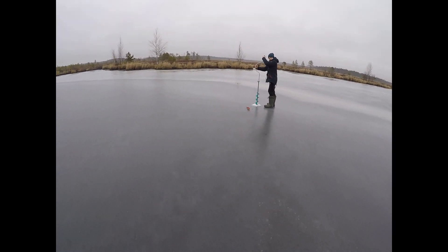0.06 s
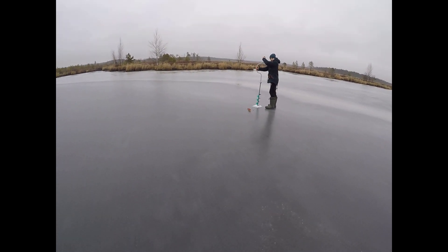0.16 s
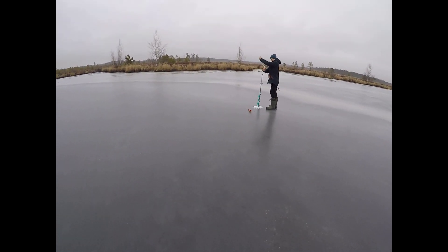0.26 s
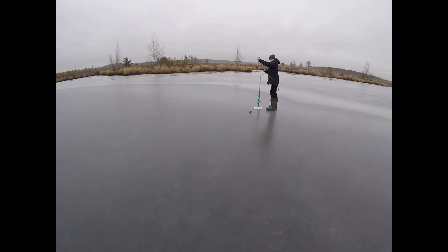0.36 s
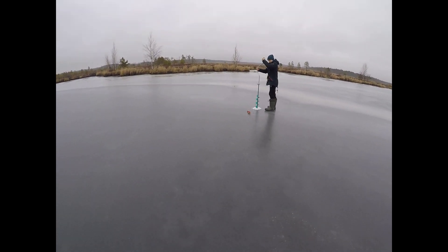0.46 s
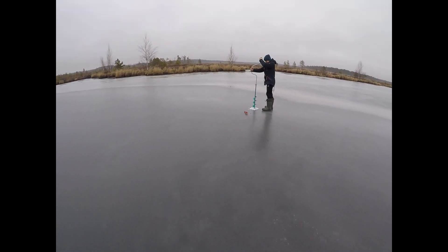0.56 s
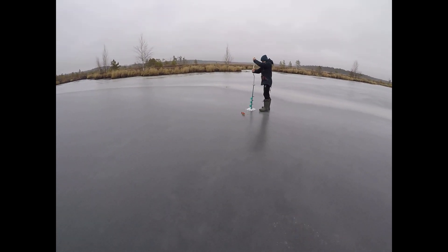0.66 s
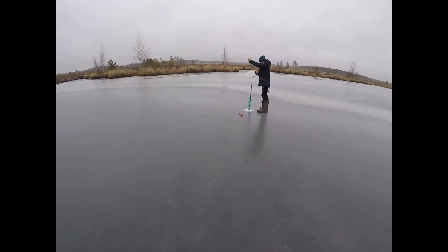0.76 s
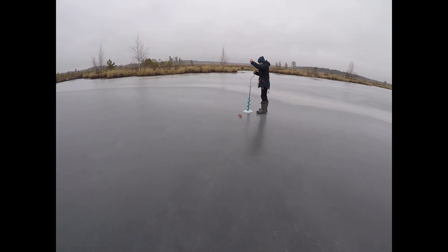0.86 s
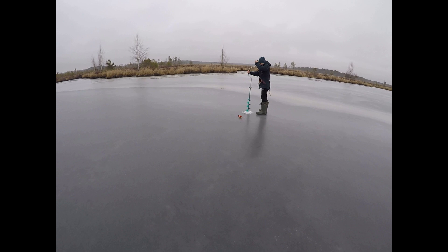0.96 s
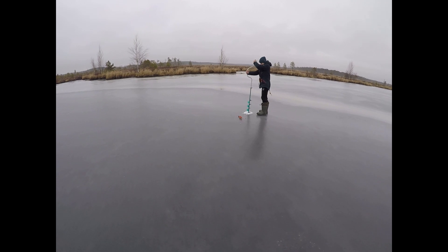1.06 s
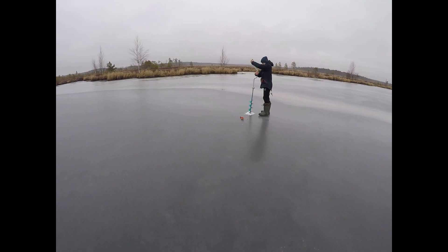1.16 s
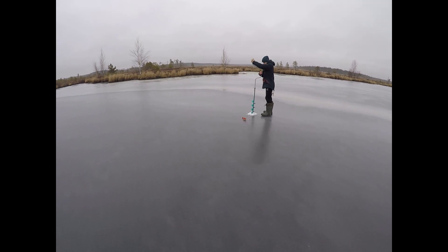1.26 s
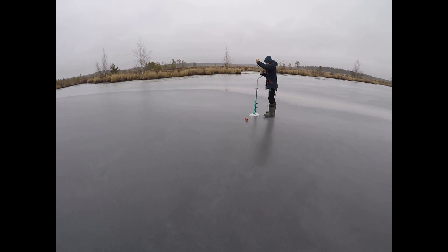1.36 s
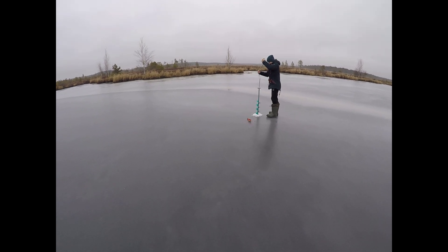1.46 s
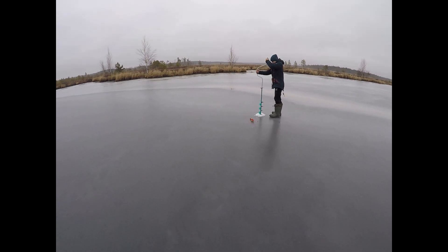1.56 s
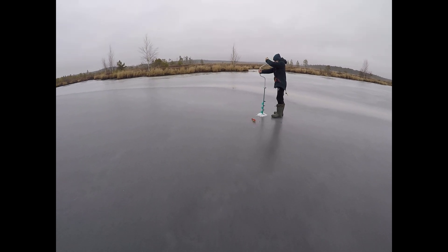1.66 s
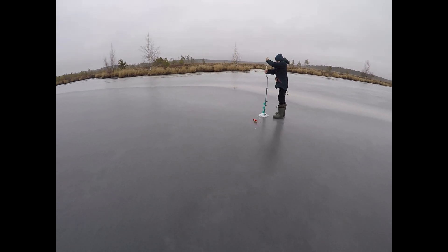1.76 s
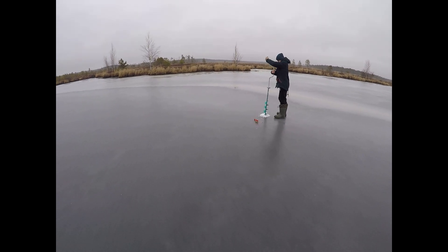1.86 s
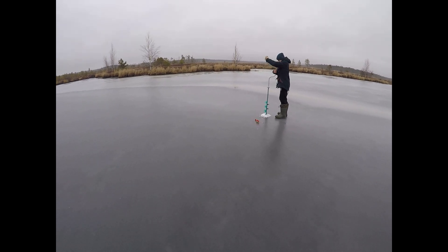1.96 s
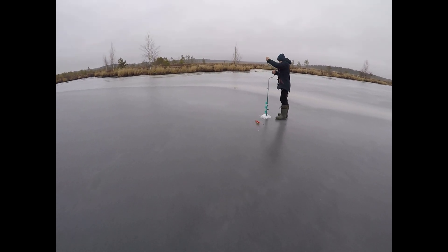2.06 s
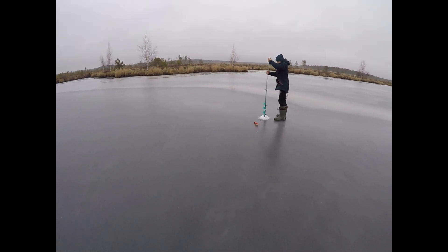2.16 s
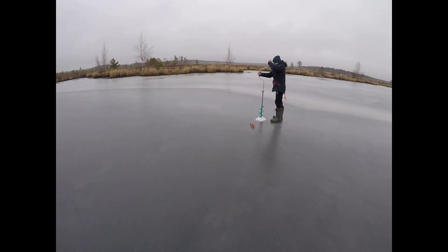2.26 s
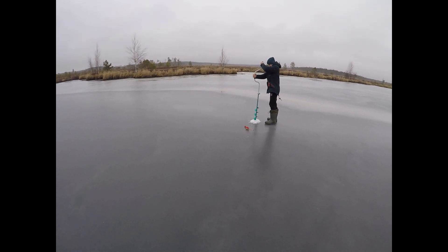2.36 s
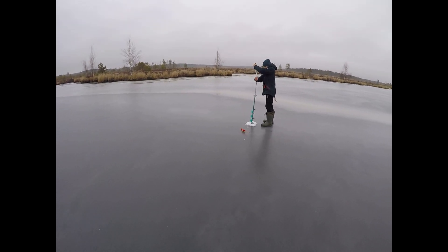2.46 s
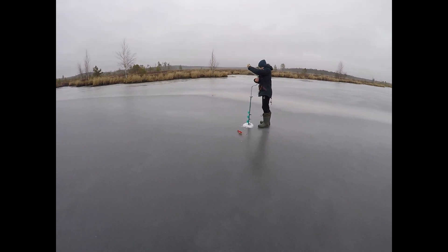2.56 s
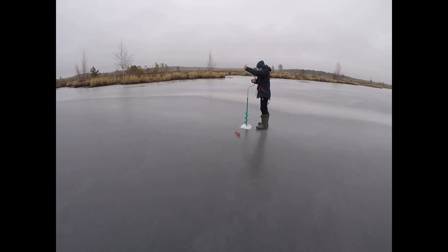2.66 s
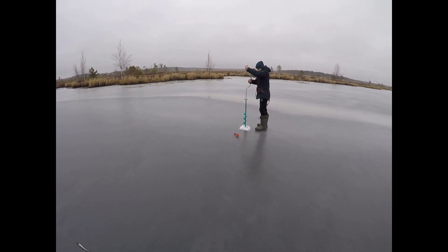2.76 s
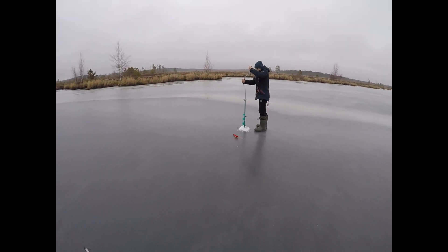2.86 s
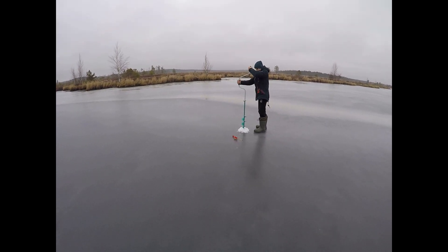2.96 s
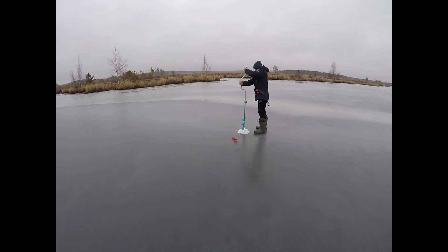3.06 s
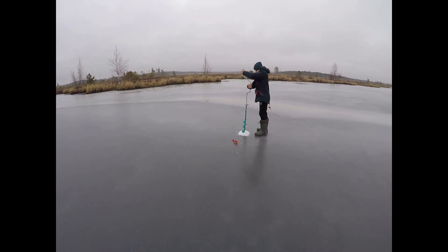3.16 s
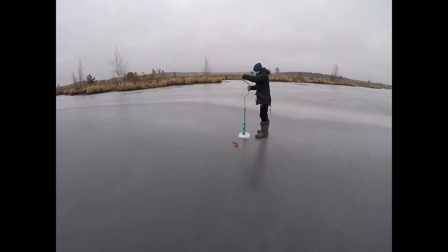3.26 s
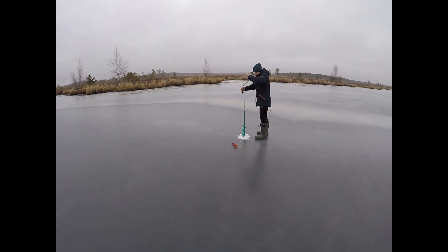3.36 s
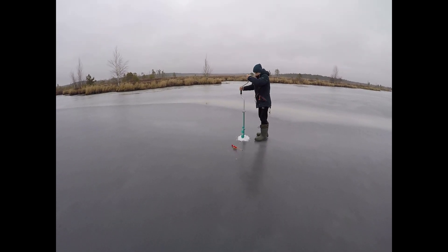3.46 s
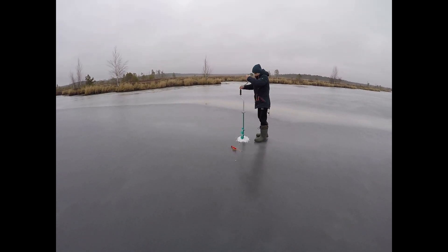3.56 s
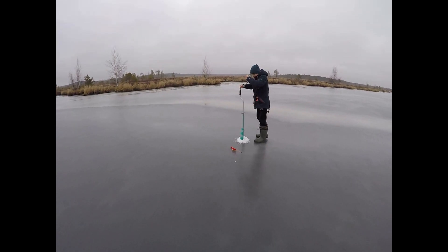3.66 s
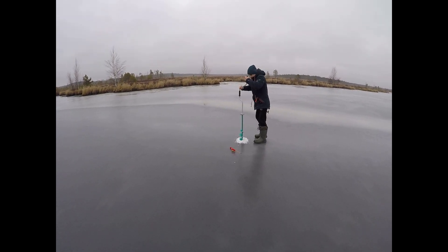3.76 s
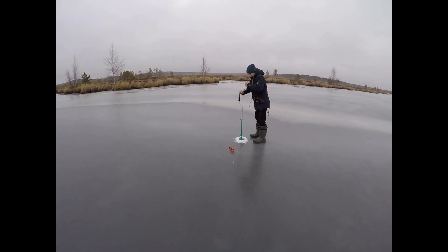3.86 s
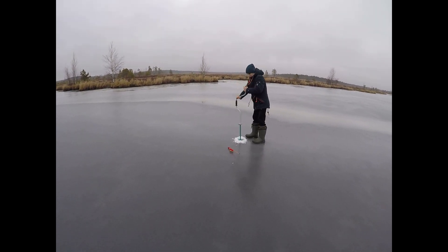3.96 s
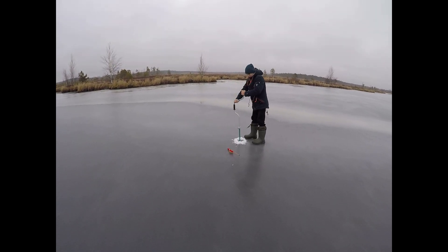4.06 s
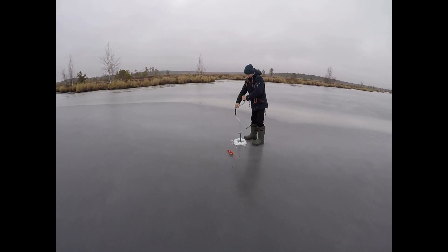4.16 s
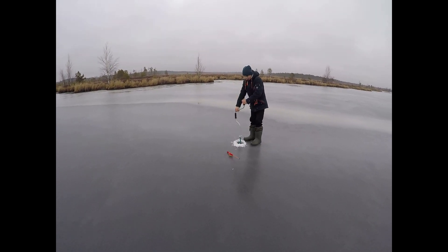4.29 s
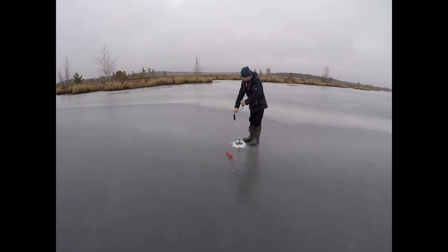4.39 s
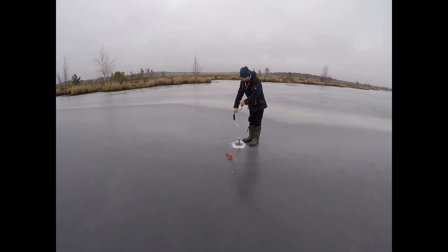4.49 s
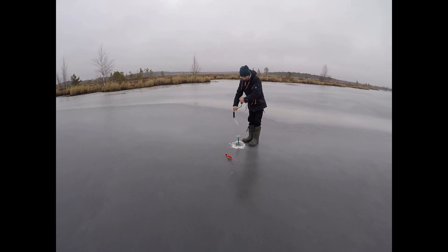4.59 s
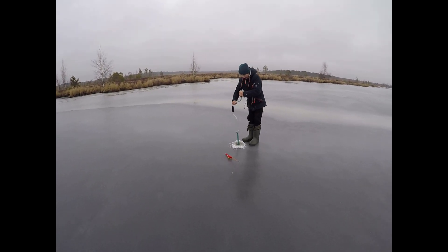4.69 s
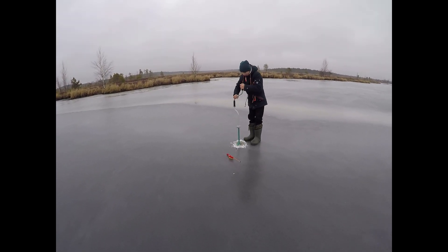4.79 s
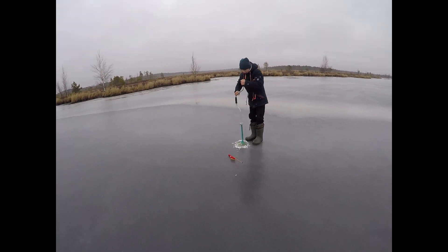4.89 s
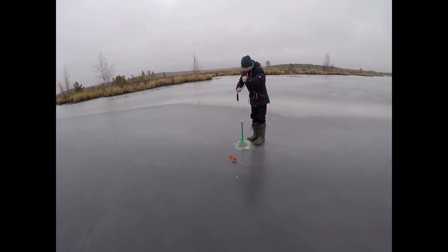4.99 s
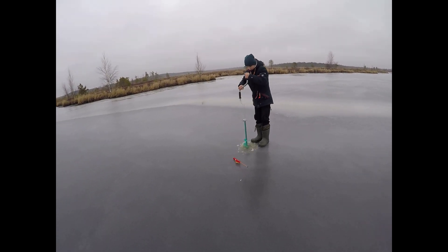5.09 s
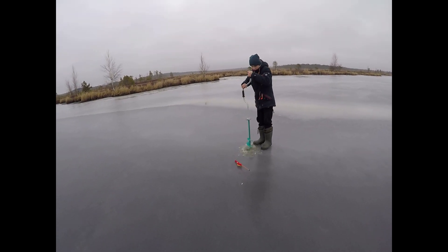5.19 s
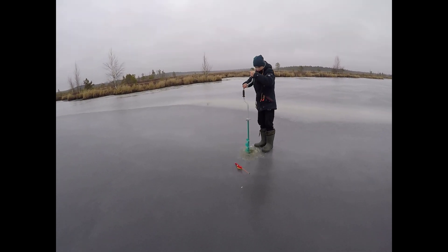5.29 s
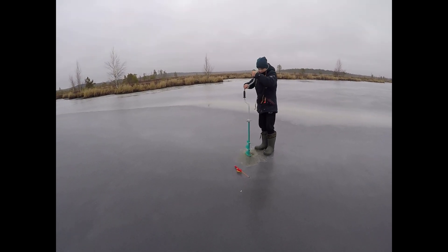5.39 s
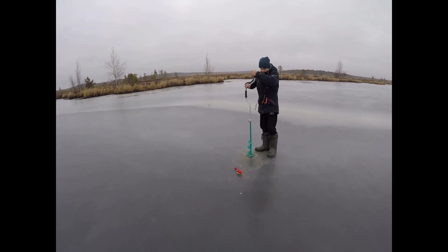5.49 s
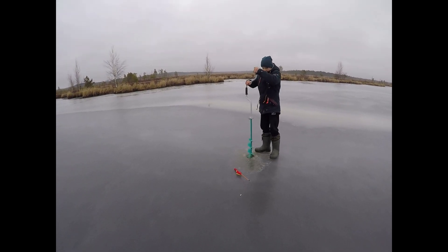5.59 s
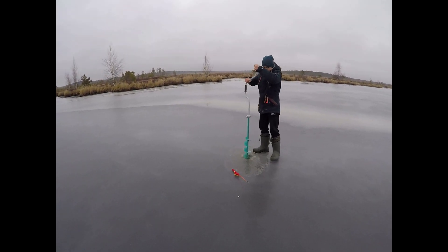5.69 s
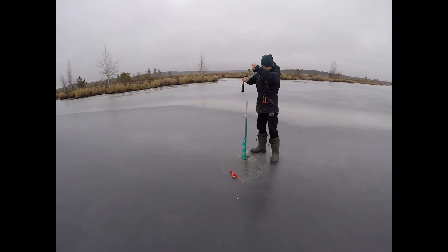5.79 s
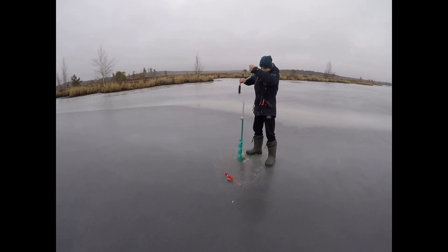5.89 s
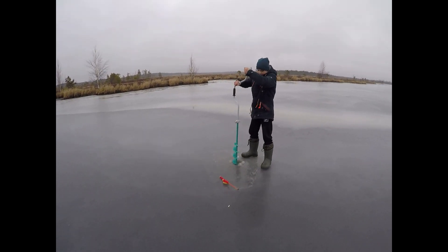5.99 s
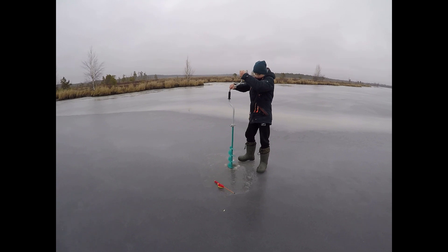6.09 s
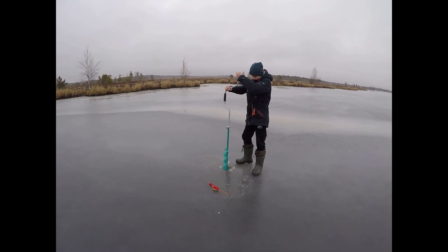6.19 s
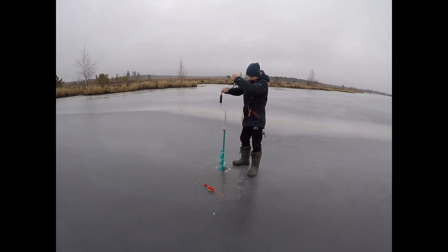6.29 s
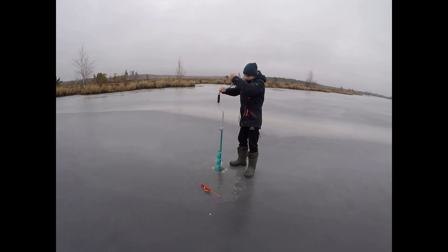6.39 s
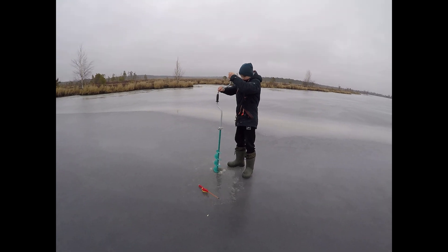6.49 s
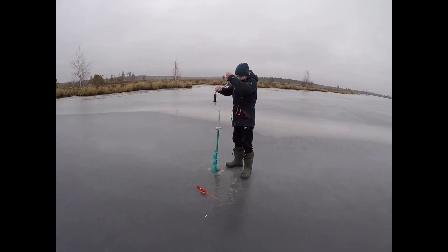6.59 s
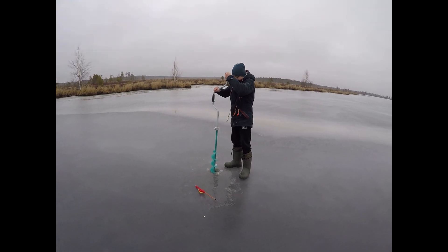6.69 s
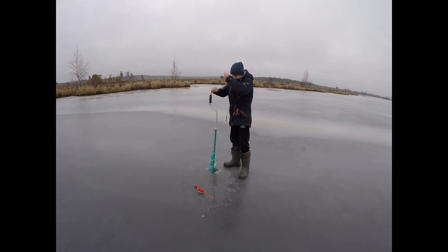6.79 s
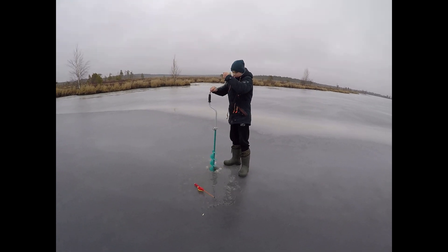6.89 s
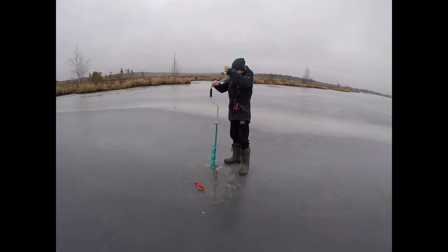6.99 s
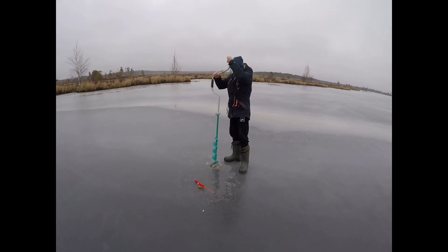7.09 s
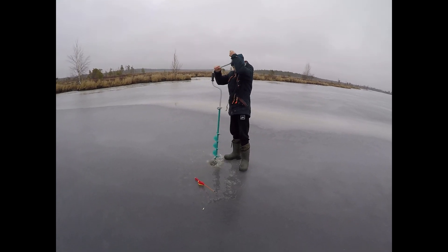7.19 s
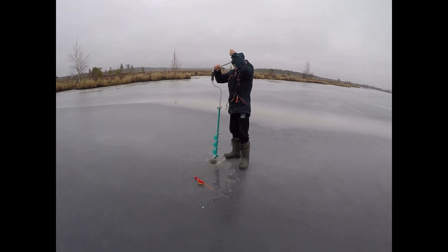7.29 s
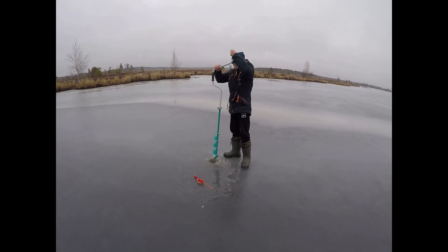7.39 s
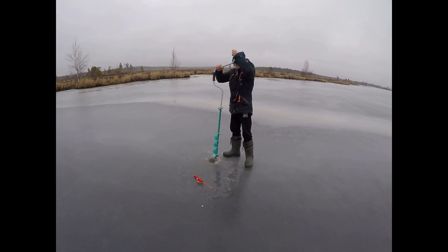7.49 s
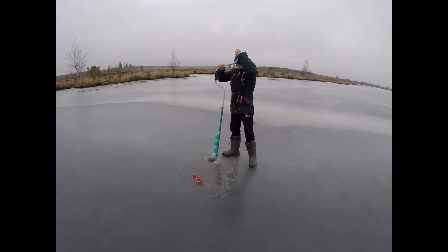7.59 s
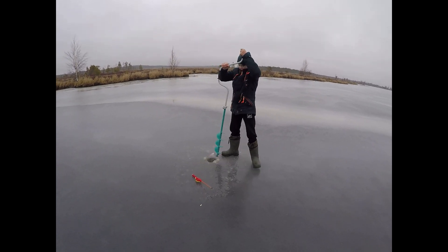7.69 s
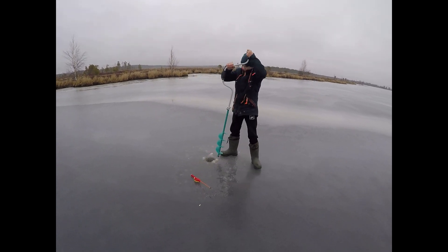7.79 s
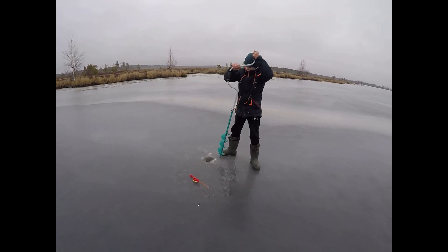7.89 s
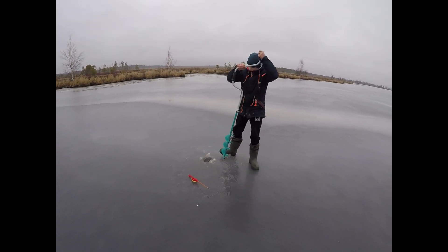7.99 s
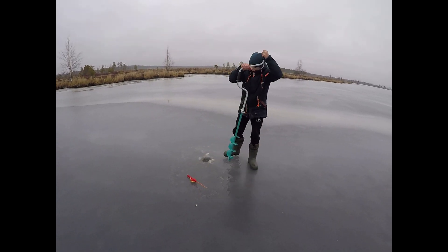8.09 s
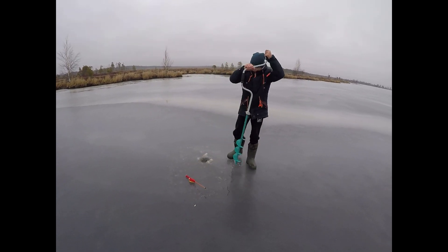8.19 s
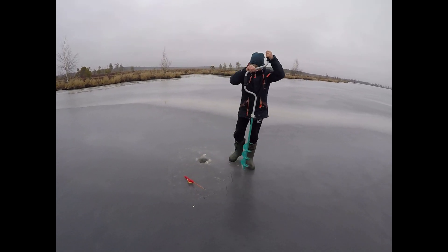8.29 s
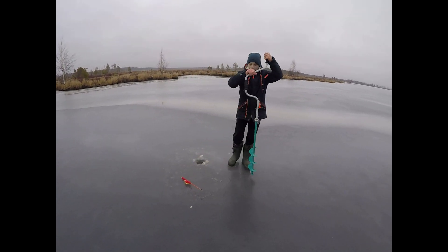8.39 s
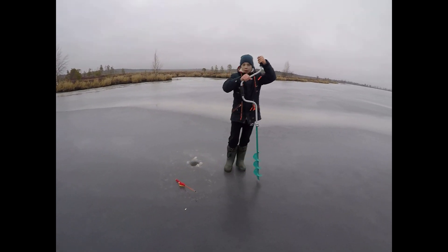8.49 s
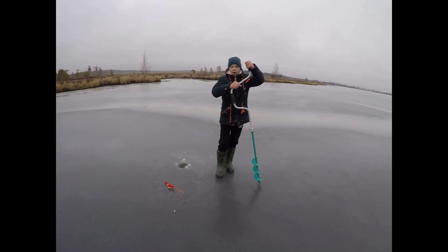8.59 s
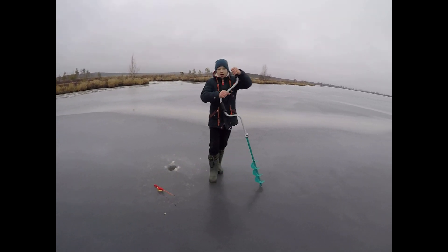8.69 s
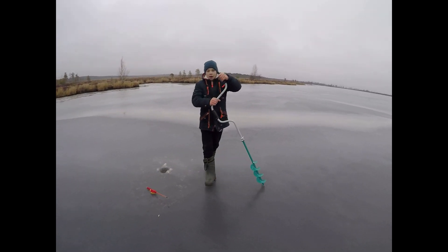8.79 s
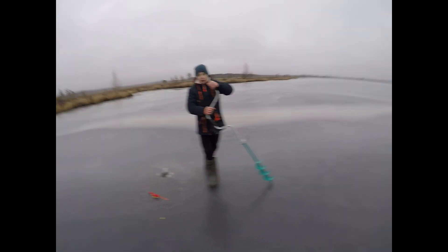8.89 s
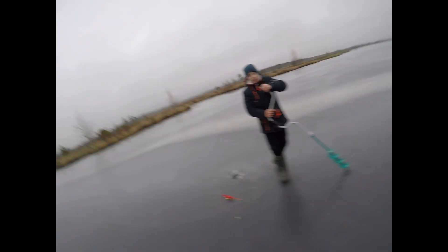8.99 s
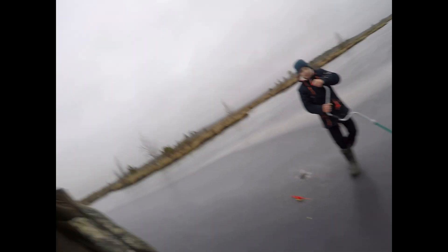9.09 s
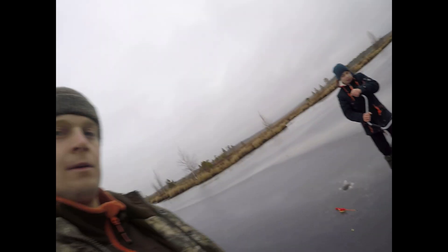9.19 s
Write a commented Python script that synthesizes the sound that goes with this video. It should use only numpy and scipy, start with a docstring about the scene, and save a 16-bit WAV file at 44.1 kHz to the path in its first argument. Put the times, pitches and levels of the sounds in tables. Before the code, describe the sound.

Dry, crackling shavings and ringing steel come from an auger cutting thin ice outdoors. After a sharp last bite and short lull, wet ice crunches at the rim, bubbles gulp, water washes and splashes, and drops fall. Late scraping knocks lead to a brief skid with a short metallic ring. Stereo handheld microphone, no room echo, with handling rumble, soft hiss, faint high whine and a final swing of rustle and wind.

```python
"""A hand auger shaves through thin lake ice, stops, then crunches through: fractures excite ice and steel.
In the flooded hole, gliding bubble tones glug, and noise shaped by bursts washes, slaps and drips.
The blade glances off the ice and its steel modes ring on as decaying sines.
The hand-held camera rumbles, hisses and whines, and swings away with a rustle of clothing and air buffets."""
import sys
import numpy as np
from scipy import signal
from scipy.fft import rfft, irfft, next_fast_len
from scipy.io import wavfile
from scipy.ndimage import uniform_filter1d, map_coordinates

SR = 44100
rng = np.random.default_rng(int(sys.argv[2]) if len(sys.argv) > 2 else 0)


def waveform_to_disk(signal):
    """Save audio, clipped to [-1, 1], as 16-bit WAV at the path in sys.argv[1]."""
    frames = np.transpose(np.atleast_2d(signal))
    scaled = np.clip(frames, -1, 1) * 32767
    samples = np.round(scaled).astype(np.int16)
    wavfile.write(sys.argv[1], SR, samples)


N = 407925  # length in samples

# Levels marked "relative" are trimmed, filtered or mixed further in the layer that uses them.
# how hard the blades bear on the ice: [t/s, relative level/dB]
BLADE_PUSH = [(0, -27), (0.27, -29), (0.32, -36), (1.08, -35.5), (1.15, -30), (1.6, -21), (3.182, -20)]
# blades catching and breaking off a larger flake: [t/s, relative level/dB]
BLADE_BITES = [(0.235, -11), (0.335, -19), (0.424, -17), (0.485, -15.5), (0.575, -16), (0.666, -17.5),
               (3.184, -7.5), (3.238, -15)]
# the pit under the blades rings lower and louder as it deepens: [t/s, f/Hz, level/dB relative to the force]
PIT_RING = [(0, 1181, -22), (2.3, 839, -13.5), (3.05, 634.5, -10.5)]
# modes of the steel auger: [f/Hz, width/Hz before the damping factor, relative level/dB]
STEEL_MODES = [(593.5, 12, -3.5), (806.5, 18, 3), (1237, 24, 4), (1507, 20, 3.5), (1738, 31, 11.5),
               (1890, 7.3, 10.5), (2453, 190, 0.5), (2778, 30, 1.5), (3590, 81, -7), (3906, 250, 0),
               (5195, 210, 4), (5660, 70, -2)]
# shoves of the spiral crushing wet ice at the rim:
# [start t/s, length/s, relative level/dB, steel level/dB relative to the shove]
RIM_CRUNCHES = [(3.496, 0.09, -39.5, -17), (3.738, 0.025, -15, -33), (3.764, 0.075, -7.5, -23),
                (3.853, 0.0088, -3.5, -19), (3.877, 0.014, -5, -20), (3.902, 0.043, -7.5, -15.5),
                (3.96, 0.035, -5.5, -21.5), (4.011, 0.03, -8.5, -46), (4.166, 0.011, -16.5, -35),
                (6.44, 0.0052, -9.5, -16.5), (6.457, 0.029, -10, -32), (6.881, 0.0064, -15.5, -14.5),
                (6.984, 0.006, -10.5, -10), (7.003, 0.012, -7.5, -20), (7.032, 0.047, -12, -16)]
# air pockets gulping in the hole, each throwing up slush:
# [t/s, relative ring level/dB, f/Hz, relative slush level/dB]
AIR_GLUGS = [(4.787, -14.5, 427, -15), (4.838, -7.5, 420, -16.5), (4.942, -6, 700, -17.5),
             (5.044, -6, 500, -17.5), (5.1, -7, 635, -23), (5.21, -8, 840, -10.5), (5.297, -11, 1030, -14)]
# the air in the hole rings, rising as water climbs and falling as the spiral leaves:
# [start t/s, length/s, relative level/dB, first f/Hz, last f/Hz]
HOLE_GULPS = [(3.903, 0.0387, -22, 1091, 1524), (3.985, 0.037, -25.5, 720, 1160),
              (3.937, 0.038, -23.5, 2190, 2780), (4.96, .3, -29.5, 440.5, 578),
              (5.04, 0.031, -18.5, 680, 608), (5.659, 0.035, -34, 750, 880),
              (6.439, 0.033, -22.5, 1765, 1560), (7.007, 0.059, -25.5, 900, 839),
              (7.067, 0.079, -32.5, 620, 605)]
# slush falling back on the ice, and at 9.01 s a scuff on the ice: [t/s, relative level/dB]
SPLASHES_AND_SCUFF = [(4.864, -19.5), (5.122, -14), (5.336, -16.5), (5.644, -14.5), (5.7195, -14.5),
                      (9.012, -11.5)]
# drops falling from the spiral: [t/s, relative level/dB, f/Hz]
SPIRAL_DRIPS = [(5.897, -16.5, 2470), (5.9448, -29, 1720), (6.338, -23, 1670), (7.2663, -24, 2760),
                (8.001, -34.5, 2370)]
# crumbs of ice snapping off the auger and ticking on the ice: [t/s, relative level/dB]
ICE_TICKS = [(3.304, -16), (7.283, -22), (7.777, -36.5), (7.914, -32.5), (8.062, -35), (8.628, -28),
             (8.686, -40), (8.728, -21)]
# strokes of the auger stirring the water:
# [start t/s, length/s, relative wash level/dB, relative spray level/dB]
WATER_STROKES = [(4.04, 0.47, -43.5, -49.5), (4.551, 0.41, -36.5, -48.5), (4.786, 0.45, -43.5, -34.5),
                 (5.349, 0.4, -40.5, -40), (5.836, 0.052, -41.5, -39.5), (6.119, 0.2, -44, -44),
                 (6.444, 0.14, -39.5, -50.5), (7.316, 0.037, -53, -37.5)]
# the blade glancing off the ice: [start t/s, length/s, relative level/dB]
BLADE_GLANCE = [(8.742, 0.025, -20)]
# clothing brushing past as the camera swings: [t/s, relative rustle level/dB, air buffet level/dB]
CAMERA_SWING = [(8.82, -48, -74), (8.92, -28.5, -63), (9.05, -24, -43), (9.25, -21, -31)]
# a sleeve brushing past the camera: [start t/s, length/s, relative level/dB]
SLEEVE_BRUSH = [(4.66, 0.077, -22)]
# the hand shifting its grip on the camera case: [start t/s, length/s, relative level/dB]
GRIP_SHIFTS = [(1.08, 0.94, -45.5), (3.33, 0.082, -39), (3.75, 3.72, -41.5), (7.735, 0.19, -40.5),
               (8.23, 0.049, -40), (8.69, 0.87, -39)]

# brittle shavings under the blades: [f/Hz, relative level/dB]
SHAVING_SPECTRUM = [(90, -55), (330, -16.5), (800, -10), (1700, -1.5), (2700, -7.5), (3270, -10.5),
                    (4300, -10), (5500, -1), (7000, -10), (11000, -19), (14500, -36)]
# wet ice crushed at the rim: [f/Hz, relative level/dB]
WET_ICE_SPECTRUM = [(70, -80), (200, -5.5), (900, 1), (2300, -0.5), (3300, -6), (5550, -4.5), (7200, -12),
                    (11000, -18.5), (14500, -35)]
# slapping and spattering slush: [f/Hz, relative level/dB]
SLUSH_SPECTRUM = [(90, -67), (350, -8.5), (2500, -13.5), (3300, -17.5), (5500, -8.5), (8500, -20),
                  (14500, -39)]
# dull churned water: [f/Hz, relative level/dB]
WASH_SPECTRUM = [(90, -85), (300, 0), (700, 10.5), (1200, 8), (2000, -14), (2800, -6.5), (9000, -60)]
# blade edge skidding on ice: [f/Hz, relative level/dB]
EDGE_SPECTRUM = [(500, -14.5), (1900, -15), (3700, -2), (5400, -6.5), (7500, 8.5), (9000, -15),
                 (14500, -26)]
# rustling cloth: [f/Hz, relative level/dB]
CLOTH_SPECTRUM = [(80, -50), (200, 2.5), (1400, 1), (2200, -12.5), (7400, -12.5), (9500, -26), (14500, -51)]
# bumped hollow camera case: [f/Hz, relative level/dB]
CASE_SPECTRUM = [(45, -53), (108, -38), (145, 1), (200, -1), (300, -11.5), (1500, -46)]
# electronic hiss: [f/Hz, relative level/dB]
HISS_SPECTRUM = [(500, 4), (10000, -10), (14500, -31)]
# left minus right: [f/Hz, level/dB]
PORT_BALANCE = [(200, 1.5), (750, -5), (1400, 2), (3000, -6), (3900, -2.5), (5900, -11), (8000, 0.5)]
# left port's phase lead for crisp sounds: [f/Hz, phase/rad]
CRISP_LEAD = [(1200, 0.32), (2900, 0.5), (3400, 1.28), (5000, 0), (7400, 2.5), (11000, 0.5)]
# left port's phase lead for dull rushing sounds: [f/Hz, phase/rad]
RUSH_LEAD = [(400, 4.3), (1600, 1.98), (2400, 1.5), (7000, 1.2)]

TOP_HZ = 14300
CRUNCH_RISE_S, CRUNCH_T60_S, SLIPS_PER_S = 0.0005, 0.083, 190
GULP_SETTLE, GULP_RISE_S, GULP_T60_S = 0.525, 0.00078, 0.16  # pitch glide time constant as a share of length
STIR_RISE_S, RUNOFF_T60_S = 0.019, 0.54  # water follows a stroke quickly and runs off slowly
GLANCE_RISE_S, GLANCE_T60_S = 0.0026, 0.054
GRIP_DB, GRIP_RISE_S, GRIP_T60_S = -49.5, 0.0011, 0.52  # steady grip, relative dB
FLAKES_PER_S, FLAKE_DB = 20, -11.5  # flakes relative to the push, before their colour
STOP_T60_S = 0.27  # the shaving dies as the crank stops
DRIFT_S = 0.00051  # scale of the time drift as the grip of the blades changes
RING_DB, RING_DB_PER_OCTAVE, RING_T60_S = -42, 7.5, 0.47  # free auger at 1 kHz; higher modes die sooner


def amp(db):
    """Decibels become a linear gain."""
    return 10 ** (np.asarray(db) / 20)


def unit(x):
    """Scale a sound to an rms of 1."""
    return x / np.sqrt(np.mean(x ** 2) + 1e-20)


def along(points, hz):
    """Read a curve of (f/Hz, value) points on a log frequency axis."""
    f, v = np.transpose(points)
    return np.interp(np.log(hz + 1), np.log(f + 1), v)


def curves(rows):
    """One automation curve for each column after the time."""
    s, *cols = np.transpose(rows)
    return [np.interp(np.arange(N) / SR, s, c) for c in cols]


def during(rows):
    """A gate, open while a table lasts, with soft edges."""
    t = np.arange(N) / SR
    is_open = (t >= rows[0][0]) & (t <= rows[-1][0])
    return uniform_filter1d(1. * is_open, size=300)


def wobble(rate):
    """A smooth random curve with rate knots a second."""
    knots = rng.standard_normal(int(N * rate / SR) + 4)
    return map_coordinates(knots, [np.arange(N) * rate / SR])


def add(track, s, sound):
    """Mix a sound into a track at time s."""
    i = max(round(s * SR), 0)
    track[i:i + len(sound)] += sound[:max(N - i, 0)]


def filtered(x, response):
    """Filter a sound by a complex response of frequency."""
    m = 2 * next_fast_len(N // 2 + SR // 4)
    return irfft(rfft(x, m) * response(np.fft.rfftfreq(m, 1 / SR)), m)[..., :N]


def colour(points, hz):
    """Minimum-phase response with a given spectrum and unit power, made by folding the cepstrum."""
    cepstrum = irfft(np.log(amp(along(points, hz))))
    cepstrum[1:len(hz) - 1] *= 2
    cepstrum[len(hz):] = 0
    response = np.exp(rfft(cepstrum))
    return response / np.sqrt(np.mean(abs(response) ** 2))


def steel(hz, damping):
    """The auger's resonant modes at unit power; less damping narrows them as the ice lets go."""
    response = 0
    for centre, width, db in STEEL_MODES:
        loss = 1j * hz * width * damping
        response = response + amp(db) * loss / (centre * centre - hz * hz + loss)
    return response / np.sqrt(np.mean(abs(response) ** 2))


def grains(rate, spread_db):
    """Random tiny impacts of uneven size and either sign, rms 1."""
    hits = rng.random(N) < rate / SR
    signs = rng.choice([-1, 1], N)
    sizes = amp(spread_db * np.clip(rng.standard_normal(N), -2, 2))
    return unit(hits * signs * sizes)


def bursts(rows, rise, hold=1):
    """Envelope of (s, dB, t60) bursts whose powers add; a hold above 1 delays the drop."""
    power, t = np.zeros(N), np.arange(SR // 2) / SR
    for s, db, t60 in rows:
        level = amp(db - 60 * (t / t60) ** hold) * (1 - np.exp(-t / rise))
        add(power, s, level ** 2)
    return np.sqrt(power)


def held(rows, rise, t60):
    """Envelope of (start s, length s, dB) events that rise, hold and die away; their powers add."""
    power = np.zeros(N)
    for s, length, db in rows:
        t = np.arange(int((length + 2 * t60) * SR)) / SR
        fall_db = 60 * np.maximum(t - length, 0) / t60
        add(power, s, (amp(db - fall_db) * (1 - np.exp(-t / rise))) ** 2)
    return np.sqrt(power)


def fractures(rate, life, spread_db):
    """Snaps at uneven intervals, each jumping up and decaying exponentially: an envelope of rms 1."""
    snaps = grains(rate, spread_db) ** 2
    return unit(np.sqrt(signal.lfilter([1], [1, -np.exp(-2 / (life * SR))], snaps)))


def bubble(hz, cycles, glide, onset):
    """An air pocket rings for some cycles while its pitch drifts up."""
    turns = np.arange(int(SR * cycles / hz) + 2) * hz / SR
    tone = np.sin(2 * np.pi * turns * (1 + glide * turns / cycles))
    return tone * amp(-60 * turns / cycles) * (1 - np.exp(-turns / onset))


def plop(hz, cycles, trail_s, trail_db):
    """One air pocket rings and breaks up into a fading trail of small ones."""
    track = np.zeros(SR // 2)
    add(track, 0, bubble(hz, cycles, glide=0.068, onset=0.55))
    for delay, size, strength in rng.random((40, 3)):
        small = bubble(hz * 2 ** (2 * size - .4), cycles, glide=0.22, onset=1)
        add(track, trail_s * delay, amp(trail_db - 10 * (delay + size + strength)) * small)
    return track


def fizz(count, centre_hz, octaves):
    """A steady crowd of little bubbles of uneven pitch and size, rms 1."""
    track = np.zeros(N)
    times = rng.random(count) * N / SR
    spreads = np.clip(rng.standard_normal((count, 2)), -2, 2)
    for s, (pitch, size) in zip(times, spreads):
        hz = centre_hz * 2 ** (octaves * pitch)
        add(track, s, amp(3.0 * size) * bubble(hz, cycles=25.4, glide=0.15, onset=0.91))
    return unit(track)


def shifting(x, depth_db):
    """Each patch of time and frequency gets a random gain, so the colour keeps shifting."""
    z = signal.stft(x, nperseg=256)[2]
    field = uniform_filter1d(rng.standard_normal(z.shape), size=5, axis=0)  # across frequency
    field = uniform_filter1d(field, size=14, axis=1)  # across time
    return signal.istft(z * amp(depth_db * unit(field)), nperseg=256)[1][:N]


def ports(x, phase, apart_db):
    """Two microphone ports differ in level and phase by frequency; treble flutters oppositely in each."""
    side = np.array([[.5], [-.5]])  # left, right
    flutter = amp(apart_db) * filtered(x * wobble(500), lambda hz: hz / (hz + 2000))

    def placement(hz):
        """Level and phase of each port."""
        return amp(side * along(PORT_BALANCE, hz)) * np.exp(1j * side * along(phase, hz))
    return filtered(x + 2 * side * flutter, placement)


def camera():
    """Fingers bump the hollow case, which rocks the ports against each other; electronics hiss and whine."""
    left, right, rocking = [grains(rate=240, spread_db=5) for _ in range(3)]
    bumps = np.array([0.63 * (left + rocking), right - rocking])
    grip = np.hypot(amp(GRIP_DB), held(GRIP_SHIFTS, GRIP_RISE_S, GRIP_T60_S))
    rumble = grip * amp(5.0 + 3.7 * wobble(16)) * filtered(bumps, lambda hz: colour(CASE_SPECTRUM, hz))
    hiss = amp(-52.0) * filtered(rng.standard_normal((2, N)), lambda hz: colour(HISS_SPECTRUM, hz))
    narrow = filtered(rng.standard_normal((2, N)), lambda hz: 1 / (1 + ((hz - 7807) / 55) ** 2))
    whine = amp(-60.5) * unit(narrow)
    return rumble + hiss + whine


def sliding():
    """Clothing rustles as filtered grains; as the camera swings, low air noise buffets each port."""
    rustle_db, buffet_db = curves(CAMERA_SWING)
    swing = during(CAMERA_SWING)
    rustle = swing * amp(rustle_db) + held(SLEEVE_BRUSH, rise=0.017, t60=0.46)
    rubbing = grains(rate=8100, spread_db=-0.5) * amp(0.14 * wobble(62))
    cloth = filtered(rubbing, lambda hz: colour(CLOTH_SPECTRUM, hz))
    air = filtered(rng.standard_normal((2, N)), lambda hz: 1j * hz / (1 + 1j * hz / 70) ** 4)
    return ports(rustle * cloth, RUSH_LEAD, apart_db=-5.0) + swing * amp(buffet_db) * unit(air)


def glance():
    """The bare blade skids on the surface; the free auger rattles and rings on, its low modes longest."""
    chatter = held(BLADE_GLANCE, GLANCE_RISE_S, GLANCE_T60_S) * grains(rate=13000, spread_db=-3.0)
    skid = filtered(chatter, lambda hz: colour(EDGE_SPECTRUM, hz) * (1 + amp(-7.5) * steel(hz, damping=0.83)))
    start, length, _ = BLADE_GLANCE[0]
    t = np.arange(SR) / SR
    for hz, _, _ in STEEL_MODES:
        khz = hz / 1000
        db = RING_DB + RING_DB_PER_OCTAVE * np.log2(khz) - 60 * t * khz / RING_T60_S
        rattle = wobble(70)[:len(t)]  # shakes level and phase together
        ring = amp(db + 2 * rattle) * np.sin(2 * np.pi * hz * t + rattle)
        add(skid, start + length / 2, ring)
    return ports(skid, CRISP_LEAD, apart_db=-6)


def water():
    """Water washes round the spiral as noise and bubbles; slush slaps, something scuffs the ice, single drops
    and crumbs fall."""
    wash_strokes = [(s, length, db) for s, length, db, _ in WATER_STROKES]
    spray_strokes = [(s, length, db) for s, length, _, db in WATER_STROKES]
    flow = held(wash_strokes, STIR_RISE_S, RUNOFF_T60_S)
    spatter = held(spray_strokes, STIR_RISE_S, RUNOFF_T60_S)
    swirl = filtered(grains(rate=10000, spread_db=1), lambda hz: colour(WASH_SPECTRUM, hz))
    wash = flow * (amp(7.5) * swirl + amp(3) * fizz(count=3500, centre_hz=874, octaves=0.743))

    spray = spatter * fractures(rate=170, life=0.011, spread_db=4)
    slap_rows = [(s, db, .1) for s, *_, db in AIR_GLUGS + SPLASHES_AND_SCUFF]
    tap_rows = [(s, db, .028) for s, db, *_ in SPIRAL_DRIPS + ICE_TICKS]
    slaps = amp(-7.5) * bursts(slap_rows, rise=0.00066)
    taps = amp(-5) * bursts(tap_rows, rise=0.0014)
    impacts = np.sqrt(spray ** 2 + slaps ** 2 + taps ** 2) * rng.standard_normal(N)
    slush = filtered(impacts, lambda hz: colour(SLUSH_SPECTRUM, hz))

    drops = amp(-5) * spatter * fizz(count=1300, centre_hz=2800, octaves=0.6)
    for s, db, hz in SPIRAL_DRIPS:
        add(drops, s, amp(db) * plop(hz, cycles=30, trail_s=0.016, trail_db=-10))
    dull = ports(shifting(wash, depth_db=2.2), RUSH_LEAD, apart_db=-6)
    crisp = ports(shifting(slush, depth_db=2.2) + drops, CRISP_LEAD, apart_db=-6)
    return dull + crisp


def glugging():
    """Large air pockets gulp and churn the water into froth; the hole rings and holds back the lows."""
    track, t = np.zeros(N), np.arange(N) / SR
    for s, db, hz, _ in AIR_GLUGS:
        add(track, s, amp(db) * plop(hz, cycles=22.4, trail_s=0.04, trail_db=-2.5))
    froth = bursts([(s, db - 23.5, .22) for s, db, *_ in AIR_GLUGS], rise=0.0018)
    track += froth * fizz(count=9000, centre_hz=1370, octaves=0.67)
    for s, length, db, first_hz, last_hz in HOLE_GULPS:
        glide = np.exp(-np.maximum(t - s, 0) / (GULP_SETTLE * length))
        pitch_hz = (last_hz + (first_hz - last_hz) * glide) * (1 + 0.035 * wobble(200))
        level = held([(s, length, db)], GULP_RISE_S, GULP_T60_S) * amp(2.5 * wobble(130))
        track += level * np.sin(2 * np.pi * np.cumsum(pitch_hz) / SR)
    hole = signal.sosfilt(signal.butter(3, 330, 'high', fs=SR, output='sos'), track)
    return ports(hole, CRISP_LEAD, apart_db=-10)


def crunching():
    """Wet ice crushes and bubbles against the spiral, which rings; churned water follows as a dull tail."""
    shoves = [(s, length, db) for s, length, db, _ in RIM_CRUNCHES]
    knocks = [(s, length, db + ring_db) for s, length, db, ring_db in RIM_CRUNCHES]
    slips = unit(np.hypot(1, fractures(rate=SLIPS_PER_S, life=0.0087, spread_db=2.5)))
    force = held(shoves, CRUNCH_RISE_S, CRUNCH_T60_S) * slips
    knock_force = held(knocks, CRUNCH_RISE_S, CRUNCH_T60_S) * slips
    chips = grains(rate=20000, spread_db=1.5)
    crush = filtered(force * chips, lambda hz: amp(-15) * colour(WET_ICE_SPECTRUM, hz))
    ring = filtered(knock_force * chips, lambda hz: steel(hz, damping=.75))
    tail = held(shoves, rise=.02, t60=.6) * rng.standard_normal(N)
    churn = amp(-22.0) * filtered(tail, lambda hz: colour(WASH_SPECTRUM, hz))
    wet = amp(-18.5) * force * fizz(count=3000, centre_hz=1344, octaves=0.516)
    crisp = ports(shifting(crush + ring, depth_db=1.6) + wet, CRISP_LEAD, apart_db=-7)
    return crisp + ports(churn, RUSH_LEAD, apart_db=-6)


def cutting():
    """Small fractures under the blades shake the auger and the air in the pit; brittle flakes crunch off."""
    cranking = held([(0, BLADE_PUSH[-1][0], 0)], rise=0.0005, t60=STOP_T60_S)
    push_db = curves(BLADE_PUSH)[0] + wobble(29.87)
    push = amp(push_db) * cranking * fractures(rate=460, life=0.019, spread_db=2.0)
    bites = bursts([(s, db, .035) for s, db in BLADE_BITES], rise=0.001, hold=2.9)
    force = np.hypot(push, amp(-13.0) * bites)

    chips = force * grains(rate=8000, spread_db=6.5)
    shaving = filtered(chips, lambda hz: amp(-5.5) * colour(SHAVING_SPECTRUM, hz))
    breaks = amp(FLAKE_DB) * push * fractures(rate=FLAKES_PER_S, life=0.02, spread_db=0)
    # flakes are brighter than the shaving
    flakes = filtered(breaks * rng.standard_normal(N),
                      lambda hz: colour(SHAVING_SPECTRUM, hz) * hz ** 2 / (hz ** 2 + 3000 ** 2))
    ring = filtered(force * rng.standard_normal(N),
                    lambda hz: amp(-5.5) * steel(hz, damping=1) / (1 + (hz / 7500) ** 6))
    # a wandering delay bends the pitch of the ice and the steel
    drifting = map_coordinates(shaving + ring + flakes, [np.arange(N) + DRIFT_S * SR * wobble(10)])

    pit_hz, pit_db = curves(PIT_RING)
    pit = amp(pit_db) * force * wobble(200) * np.sin(2 * np.pi * np.cumsum(pit_hz) / SR)
    return ports(shifting(drifting, depth_db=2.4) + pit, CRISP_LEAD, apart_db=-6)


def scene():
    """Everything heard on the open ice."""
    return cutting() + crunching() + glugging() + water() + glance() + sliding() + camera()


def record(dry):
    """The camera rounds off the highest peaks and cuts steeply above its band limit."""
    rounded = dry / (1 + (dry / .8) ** 6) ** (1 / 6)
    return filtered(rounded, lambda hz: 1 / (1 + (hz / TOP_HZ) ** 80))


dry = scene()
out = record(dry)
waveform_to_disk(out)
```